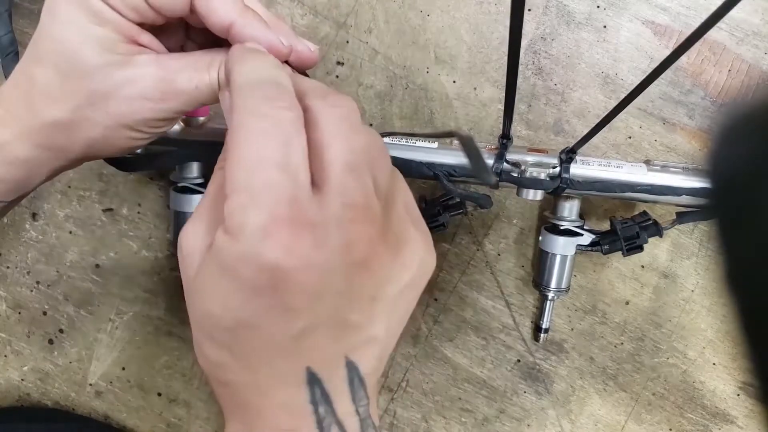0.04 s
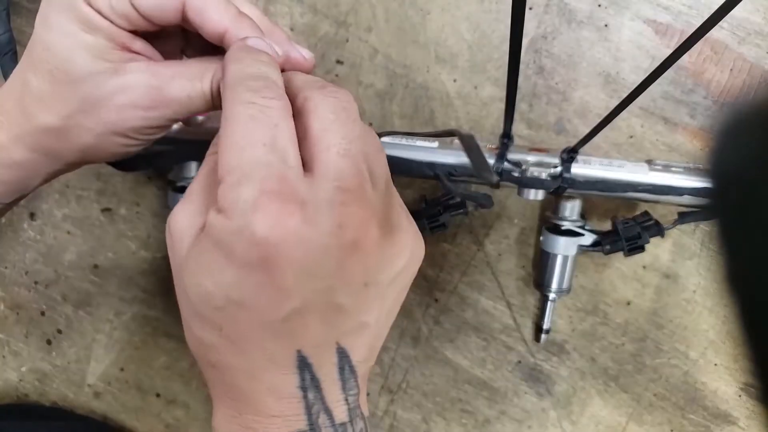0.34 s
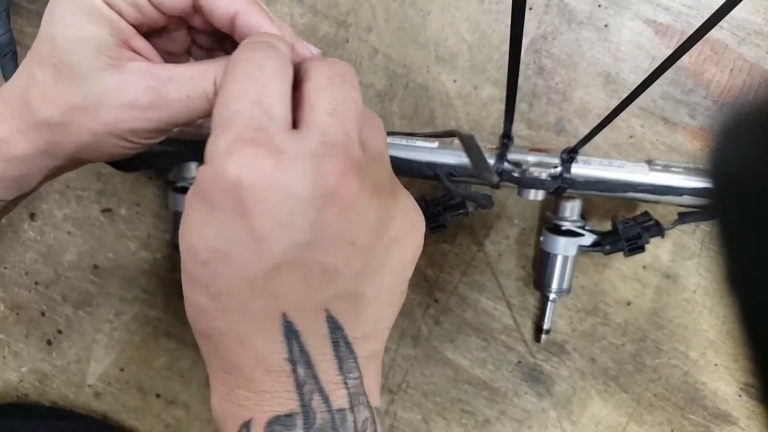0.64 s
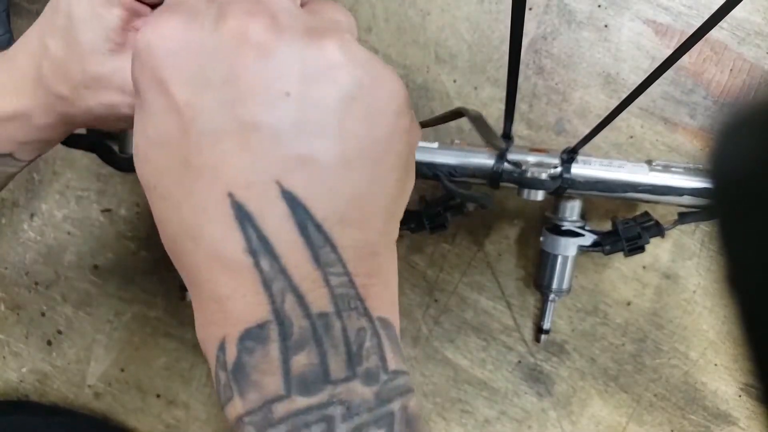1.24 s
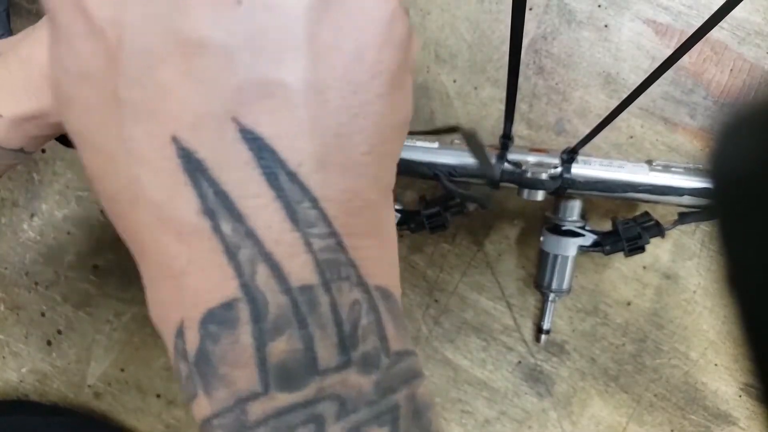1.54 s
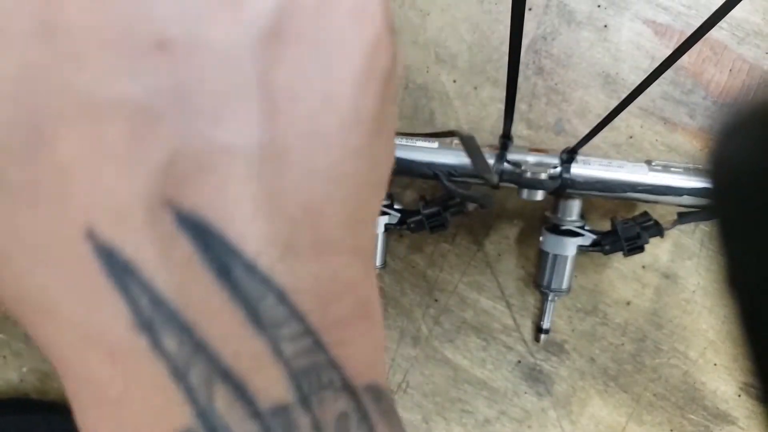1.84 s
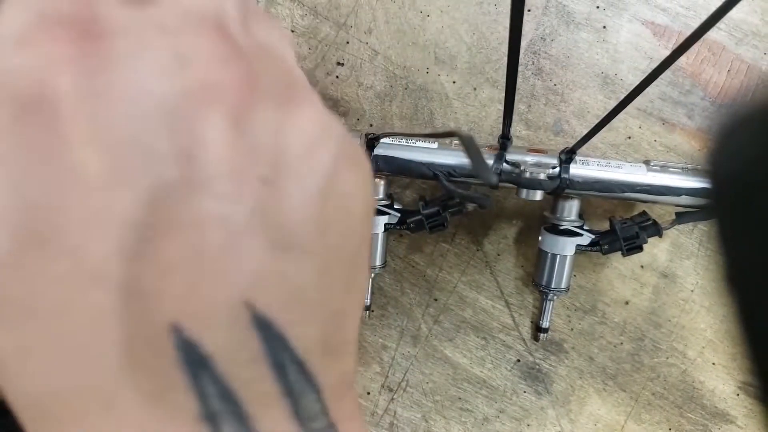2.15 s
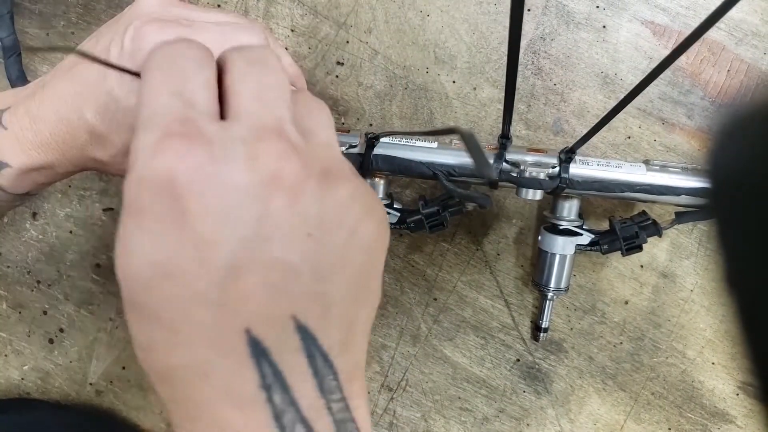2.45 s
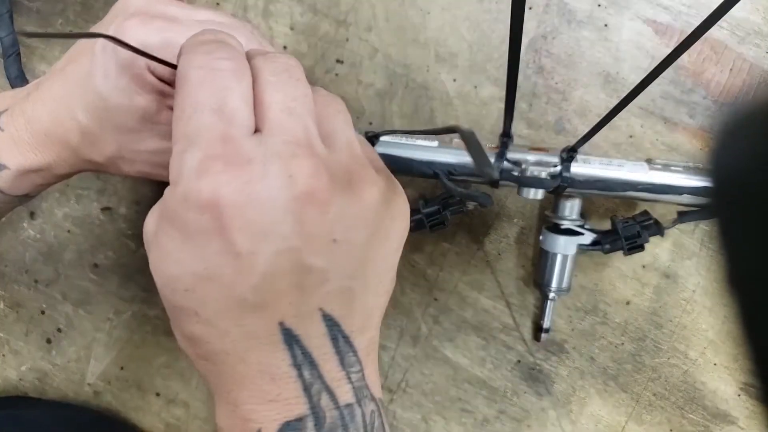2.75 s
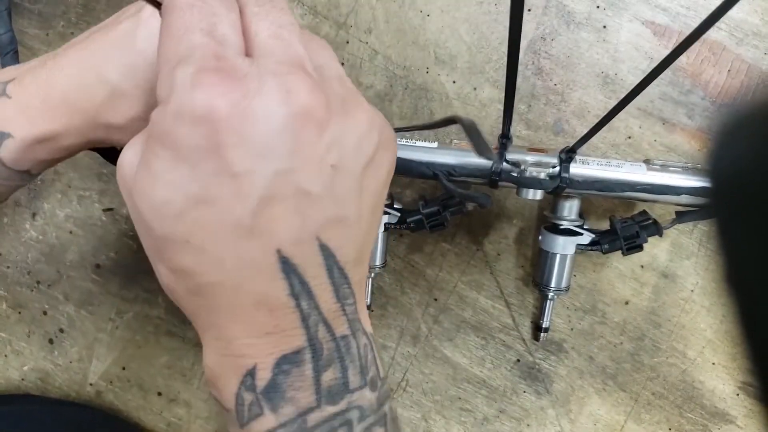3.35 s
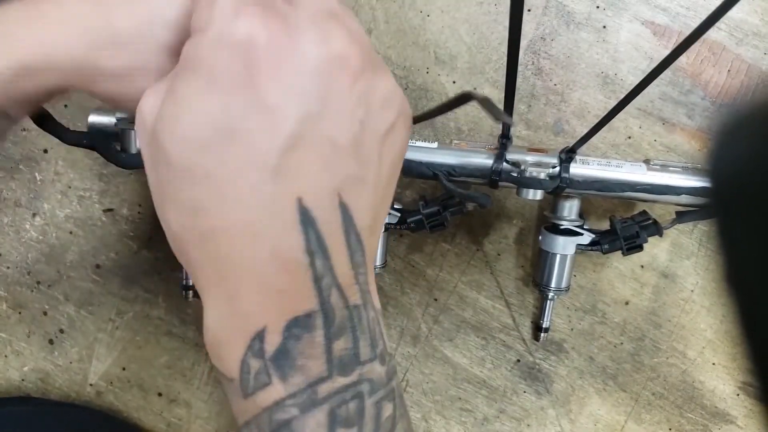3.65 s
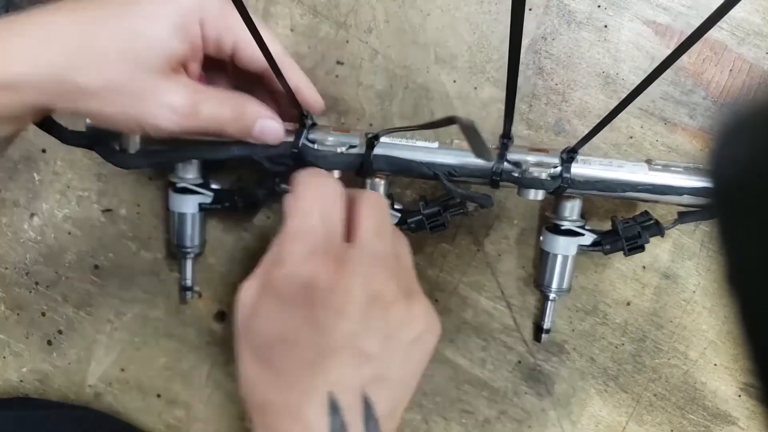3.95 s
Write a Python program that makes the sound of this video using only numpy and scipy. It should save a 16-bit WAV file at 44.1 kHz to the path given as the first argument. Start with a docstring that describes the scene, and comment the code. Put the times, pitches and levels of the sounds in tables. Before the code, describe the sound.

Close handling noise: an arm drags on the microphone's mount in short low rumbles, mostly on the right, with soft bumps and faint creaks. Brief airy skin swishes pass on the left, strongest from 0.8 to 2 seconds. After a short lull, the rubbing resumes around 2.4 seconds, with the heaviest thuds at 3 to 3.2 and near 4 seconds. A faint room hum and rush continue underneath.

```python
"""Hands at the workbench

Two hands work on a metal engine part in a quiet room, right next to the camera. Skin brushes past
the left microphone port in short airy swishes, ringing in one band where it presses harder.
The arm drags, bumps and knocks on the camera mount, which rumbles and creaks, mostly on the right.
Underneath sit a low handling rumble on the left, a room hum and a soft rush, perhaps of a fan."""
import sys
import numpy as np
from scipy import signal
from scipy.fft import rfft, irfft
from scipy.io import wavfile
from scipy.ndimage import uniform_filter1d

SR = 44100
rng = np.random.default_rng(int(sys.argv[2]) if len(sys.argv) > 2 else 0)


def int16_out(signal):
    """Quantize to a 16-bit WAV file."""
    q = np.round(np.clip(np.atleast_2d(signal).T, -1, 1) * 32767)
    wavfile.write(sys.argv[1], SR, q.astype(np.int16))


N = 176400

# swishes of skin: peak t/s, rise/s, fall/s, level/dB, shelf below the air band/dB, gap resonance f/Hz
SKIN_SWISHES = [(.1, 0.035, 0.069, -62.5, 0.5, 3620), (.512, .01, 0.017, -68, 5, 3410),
                (.637, 0.0095, .017, -65.5, 2.5, 3320), (.797, .0095, .016, -42, -1.5, 3450),
                (.879, 0.013, 0.017, -52.5, -8, 2300), (.968, 0.026, 0.049, -58, -4, 2460),
                (1.19, 0.19, 0.048, -69, -6, 3680), (1.383, .022, 0.023, -62, 1, 3600),
                (1.505, .018, 0.024, -45.5, 0, 1860), (1.67, 0.0094, .029, -40.5, -1, 3100),
                (1.885, 0.024, 0.03, -48, -3, 3570), (1.97, .027, 0.033, -55, -2, 1880),
                (2.025, 0.021, 0.025, -53, 0.5, 1780), (2.255, 0.02, 0.025, -66.5, -22, 3300),
                (2.455, .02, 0.05, -64, -8.5, 3470), (2.82, .035, .07, -70.5, 7, 3590),
                (3.203, 0.013, 0.027, -58, -2, 3800), (3.27, .018, .017, -63, -9, 3100),
                (3.987, 0.015, .025, -56.5, -3.5, 3340)]
# airy tone of brushing skin: f/Hz, level/dB
SKIN_COLOUR = [(1000, -16.5), (2500, -24.5), (4200, -20.5), (5400, -14.5), (6800, -9), (8400, -12),
               (12500, -2), (14500, 1), (16000, -1)]
# firmer, ringing scrapes: peak t/s, half length/s, level/dB, f/Hz
SKIN_SCRAPES = [(0.99, 0.017, -63.5, 7660), (1.522, 0.017, -68, 2200), (1.693, 0.02, -69, 3370),
                (1.69, 0.021, -56, 5920), (1.893, 0.032, -65.5, 3500), (1.882, .027, -58.5, 6470),
                (1.886, .025, -46.5, 14000), (1.983, 0.054, -68.5, 3930), (2.03, .02, -66, 5000),
                (3.207, .014, -60, 13000)]
# drags of the arm on the mount: start t/s, length/s, level/dB, slip rate/Hz
ARM_DRAGS = [(0.011, 0.07, -37, 111), (0.766, 0.1, -38, 113.9), (0.896, 0.17, -38, 100.6),
             (1.139, 0.067, -35, 134.4), (1.257, 0.24, -47, 109.6), (1.481, 0.083, -35.5, 140),
             (1.9, .12, -41.5, 117), (2.413, 0.075, -33.5, 139), (2.601, 0.057, -41, 137),
             (2.836, 0.079, -45, 125), (3.019, 0.091, -30, 134), (3.194, 0.064, -28, 112),
             (3.309, 0.19, -35.5, 78.4), (3.57, 0.04, -35, 103), (3.63, 0.049, -33, 83),
             (3.725, 0.15, -45.5, 83), (3.946, 0.072, -32.5, 102)]
# boomy body of the mount: f/Hz, level/dB
MOUNT_COLOUR = [(20, -33.5), (45, -28.5), (62, -13), (78, 7.5), (115, -3), (155, 0), (200, -17),
                (300, -19.5), (480, -33), (3000, -86)]
# soft bumps on the mount: peak t/s, level/dB, f/Hz
MOUNT_BUMPS = [(.757, -32.5, 82), (0.801, -30.5, 82), (1.379, -31.5, 107), (1.805, -33, 92),
               (1.874, -32.5, 90), (3.05, -17, 116), (3.13, -25, 116), (3.192, -19, 100),
               (3.987, -19.5, 96)]
# firm knocks on the mount: t/s, level/dB
MOUNT_KNOCKS = [(0.792, -50), (.994, -44.5), (1.496, -43.5), (3.035, -42)]
# upper modes of the mount that a knock rings: f/Hz, level/dB
MOUNT_MODES = [(238, 1), (325, -3.5), (610, -16)]
# creaks of the loaded mount: peak t/s, half length/s, level/dB, f/Hz, left minus right/dB
MOUNT_CREAKS = [(1.049, 0.016, -53.5, 330, -10), (1.167, 0.036, -52, 328, -8.5),
                (1.521, 0.038, -50.5, 321, -8.5), (2.436, 0.019, -50.5, 246, -2),
                (3.225, 0.023, -52.5, 282, -3.5), (3.58, 0.026, -51.5, 307, -8),
                (3.995, 0.026, -46.5, 275, -2.5)]
# fade of the grip rumble: t/s, level/dB
GRIP_FADE = [(0, -49.5), (.4, -52), (1.2, -50.5), (2.0, -56.5), (2.55, -65.5)]
# dark tone of the grip rumble: f/Hz, level/dB
GRIP_TONE = [(20, -15.5), (52, 6.5), (120, 3.5), (170, -12), (250, -11), (500, -32.5), (800, -27.5),
             (1300, -34.5), (6000, -77)]
# low hum with one brief swell: t/s, level/dB
HUM_FADE = [(0, -67), (.53, -57), (.65, -47.5), (.76, -67.5), (4, -64.5)]
# tone of the room's rush on the left: f/Hz, relative level/dB
RUSH_LEFT_COLOUR = [(20, -95.5), (52, -82), (120, -84), (240, -95), (400, -109), (2100, -113), (8500, -128),
                    (12500, -116)]
# tone of the room's rush on the right: f/Hz, relative level/dB
RUSH_RIGHT_COLOUR = [(20, -94), (120, -66), (200, -81), (240, -83), (350, -95.5), (480, -100), (620, -95),
                     (830, -99), (990, -90), (1200, -87.5), (1420, -93), (1680, -110), (8000, -127),
                     (12500, -120)]

TOP_HZ = 15850
TIME, FREQS = np.arange(N) / SR, np.fft.rfftfreq(N, 1 / SR)


def undb(db):
    """Decibels to gain."""
    return 10 ** (np.asarray(db) / 20)


def unit(x):
    """Scale to rms 1."""
    return x / np.sqrt(np.mean(x ** 2))


def response(points, f=np.fft.rfftfreq(N, 1 / SR)):
    """Gain at the frequencies f from (Hz, dB) points."""
    hz, db = np.array(points).T
    return undb(np.interp(np.log(f + 1), np.log(hz), db))


def noise(colour):
    """Noise of rms 1, shaped by a gain for each frequency."""
    return unit(irfft(rfft(rng.standard_normal(N)) * colour, N))


def wander(rate_hz):
    """Smooth random modulation of rms 1."""
    hold = int(SR / rate_hz)
    steps = np.repeat(rng.standard_normal(N // hold + 2), hold)
    return unit(uniform_filter1d(uniform_filter1d(steps, hold), hold)[:N])


def steady(x, seconds):
    """Even out the level of x over this time, as under constant pressure."""
    window = int(seconds * SR)
    power = uniform_filter1d(uniform_filter1d(x ** 2, window), window)
    return x / np.sqrt(power + 1e-3 * np.mean(x ** 2))


def fader(points):
    """A gain ride through points of t/s, level/dB."""
    return undb(np.interp(TIME, *np.array(points).T))


def skin(grain_db=2, drift=.018, ripple_db=3.6, right_db=-30.5):
    """Tiny slips of skin hiss; the moving hand shifts the resonances, finger scatter adds ripple."""
    grains = unit(rng.standard_normal(N) * undb(grain_db * wander(1200)))
    f, t, hiss = signal.stft(grains, SR, nperseg=512, noverlap=384)
    heard = f < TOP_HZ
    hand_motion = np.interp(t, TIME, wander(rate_hz=14))
    shifted = f[heard, None] * (1 + drift * hand_motion)
    ripple = rng.standard_normal(shifted.shape)
    for _ in range(2):  # smooth over frequency and time
        ripple = uniform_filter1d(uniform_filter1d(ripple, size=3, axis=0), size=16, axis=1)
    power = swish_power(shifted, t) + scrape_power(shifted, t)
    hiss[heard] *= np.sqrt(power) * undb(ripple_db * unit(ripple))
    hiss[~heard] = 0
    brushing = signal.istft(hiss, SR, nperseg=512, noverlap=384)[1][:N]
    return brushing * undb([[0], [right_db]])


def swish_power(f, t, gap_echo=.28, shelf_hz=7050, air_hz=11600):
    """Power by frequency and time: each swish swells and fades, coloured by the gap under the hand."""
    power, bands = 0, f[:, :1]
    for at, rise, fall, db, shelf_db, gap_hz in SKIN_SWISHES:
        gap_comb = 1 / np.sqrt(1 + gap_echo ** 2 - 2 * gap_echo * np.cos(2 * np.pi * f / gap_hz))
        colour = response(SKIN_COLOUR, bands) * response([(shelf_hz, shelf_db), (air_hz, 0)], bands)
        swell = np.exp(-np.abs((t - at) / np.where(t < at, rise, fall)) ** 1.53)
        power += (undb(db) * unit(colour * gap_comb)) ** 2 * swell
    return power


def scrape_power(f, t):
    """Power by frequency and time: skin pressed harder rings in one band, wider when higher."""
    power = 0
    for at, half, db, hz in SKIN_SCRAPES:
        width_hz = 16 * np.sqrt(hz)
        band = 1 / (1 + ((f - hz) / width_hz) ** 2) ** 2
        power += (undb(db) * unit(band)) ** 2 * np.exp(-((t - at) / half) ** 2)
    return power


def slips(rate_hz, gap_scatter=.17, level_scatter_db=3.13):
    """A train of stick-slip jerks, uneven in timing and weight."""
    timing, weight = rng.standard_normal((N // 100, 2)).T
    at = (np.cumsum(np.exp(gap_scatter * timing)) * SR / rate_hz).astype(int)
    jerks = np.bincount(at[at < N], undb(level_scatter_db * weight)[at < N], N)
    return jerks - jerks.mean()


def drags(attack_s=.011, release_s=.044, width_hz=94, left_db=-33):
    """The arm sticks and slips on the mount, which rumbles most near the slip rate."""
    out, mount = np.zeros(N), response(MOUNT_COLOUR)
    for at, length, db, rate_hz in ARM_DRAGS:
        attack = np.clip((TIME - at) / attack_s, 0, 1)
        release = np.exp(-np.maximum(TIME - at - length, 0) / release_s)
        near_rate = 1 / np.hypot(1, 2 * (FREQS - rate_hz) / width_hz)
        rumble = irfft(rfft(slips(rate_hz)) * mount * near_rate, N)
        out += undb(db) * attack * release * steady(rumble, seconds=.024)
    return out * undb([[left_db], [0]])


def bumps(left_db=-28.5):
    """Soft pushes rock the mount for a cycle or two: round, low thuds."""
    out = np.zeros(N)
    for at, db, hz in MOUNT_BUMPS:
        cycles = (TIME - at) * hz
        out += undb(db) * np.sin(2 * np.pi * cycles) * np.exp(-cycles ** 2 / 2)
    return out * undb([[left_db], [0]])


def knocks(attack_s=.006, t60_s=.12, left_db=-9.5):
    """Firm contacts set the upper modes of the mount ringing."""
    out = np.zeros(N)
    for at, db in MOUNT_KNOCKS:
        age = np.maximum(TIME - at, 0)
        ring = sum(undb(mode_db) * np.sin(2 * np.pi * hz * age) for hz, mode_db in MOUNT_MODES)
        envelope = np.minimum(age / attack_s, 1) * np.exp(-np.log(1000) * age / t60_s)
        out += undb(db) * ring * envelope
    return out * undb([[left_db], [0]])


def creaks(width_hz=66, octave_db=-26, grit_db=-34):
    """Friction briefly rings one upper mode of the mount, with a weak octave and a little grit."""
    out = np.zeros((2, N))
    for at, half, db, hz, left_db in MOUNT_CREAKS:
        mode, octave = (1 / (1 + (2 * (FREQS - centre) / width_hz) ** 2) for centre in (hz, 2 * hz))
        grit = 1 / (1 + (FREQS / hz / 2) ** 2)
        colour = mode + undb(octave_db) * octave + undb(grit_db) * grit
        creak = np.array([steady(noise(colour), seconds=.037) for _ in range(2)])
        swell = np.exp(-((TIME - at) / half) ** 2 / 2)
        out += creak * swell * undb([[db + left_db], [db]])
    return out


def grip():
    """A low handling rumble, hard left, that sinks away."""
    rumble = steady(noise(response(GRIP_TONE)), seconds=.054)
    return np.array([rumble * fader(GRIP_FADE), np.zeros(N)])


def room(hum_hz=51.45, left_db=-61.5, right_db=-50, swell_db=1.05):
    """The bed: a low centred hum and a gently wavering rush that leans right."""
    hum = np.sqrt(2) * fader(HUM_FADE) * np.sin(2 * np.pi * hum_hz * TIME + wander(6))
    left = undb(left_db) * noise(response(RUSH_LEFT_COLOUR))
    right = undb(right_db) * noise(response(RUSH_RIGHT_COLOUR))
    return hum + np.array([left, right]) * undb(swell_db * wander(5.92))


def scene():
    """Close skin on the left, the rumbling mount on the right, grip and room underneath."""
    return skin() + drags() + creaks() + knocks() + bumps() + grip() + room()


def record(dry):
    """A steep low-pass trims the very top."""
    return signal.sosfilt(signal.ellip(10, .2, 70, TOP_HZ, fs=SR, output="sos"), dry)


dry = scene()
out = record(dry)
int16_out(out)
```